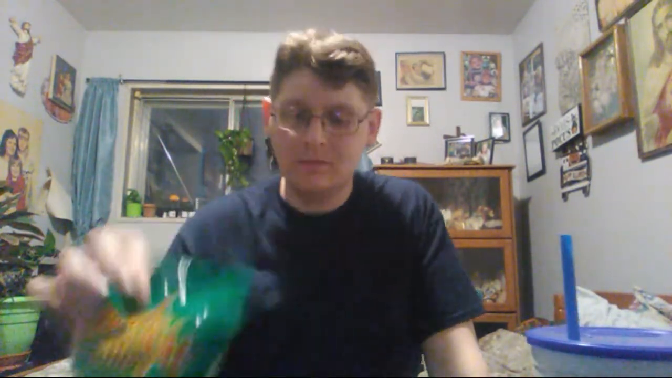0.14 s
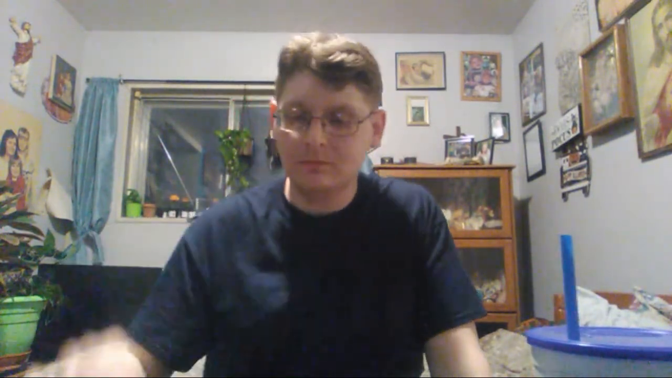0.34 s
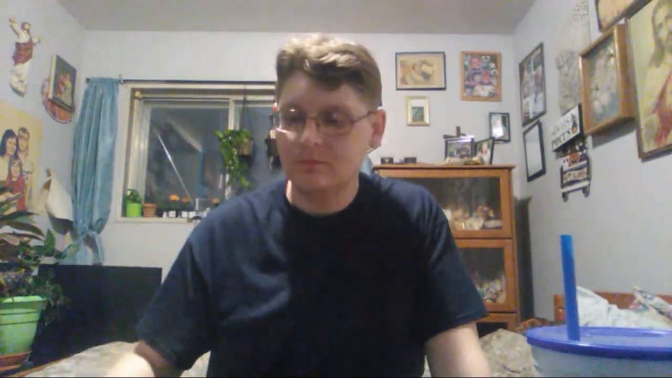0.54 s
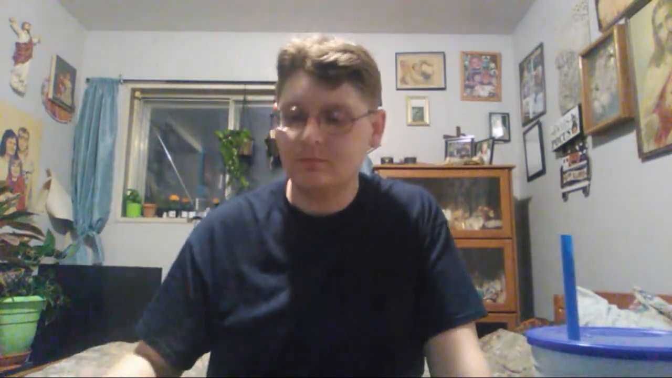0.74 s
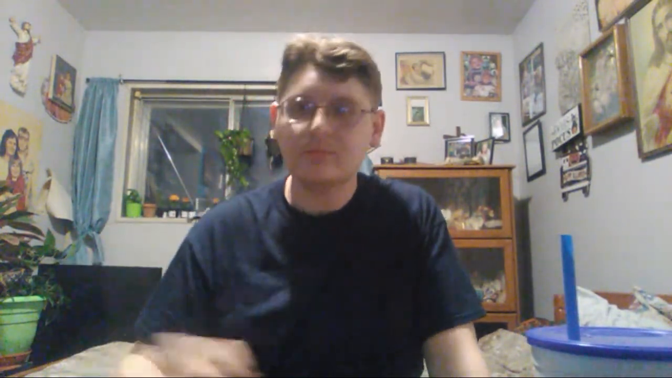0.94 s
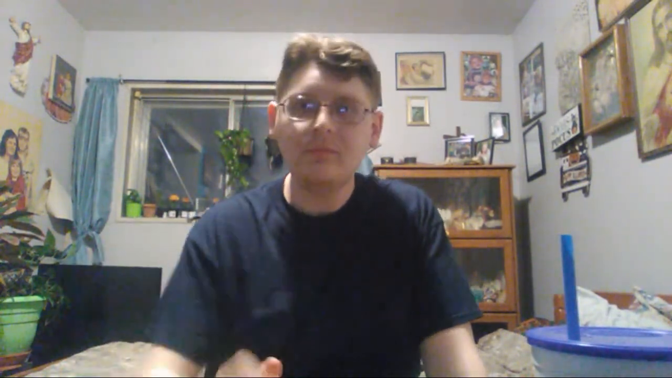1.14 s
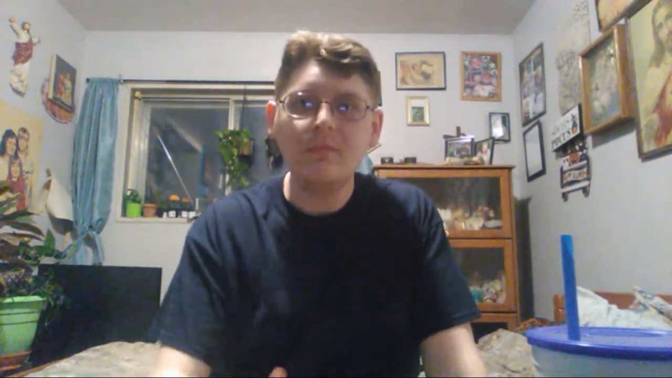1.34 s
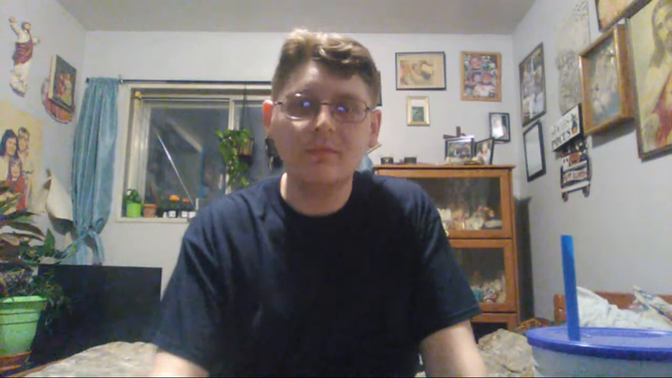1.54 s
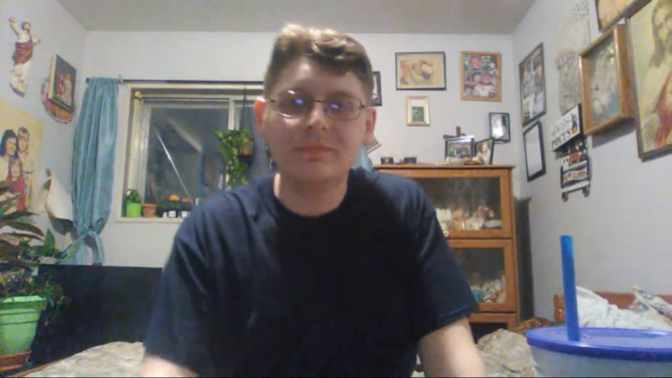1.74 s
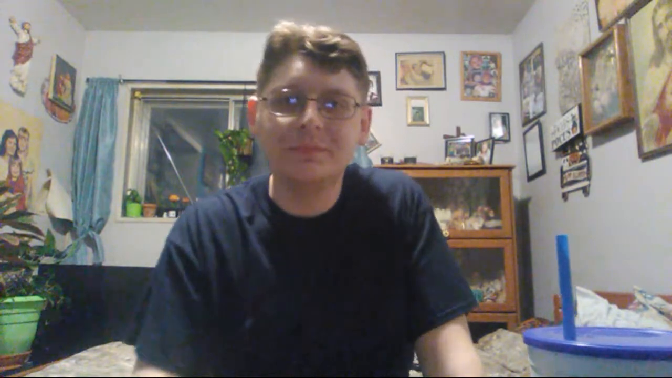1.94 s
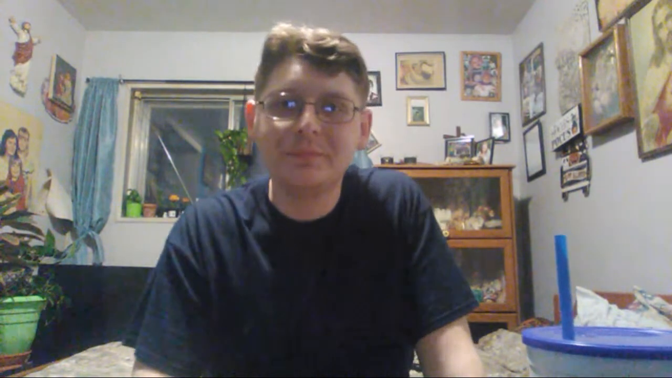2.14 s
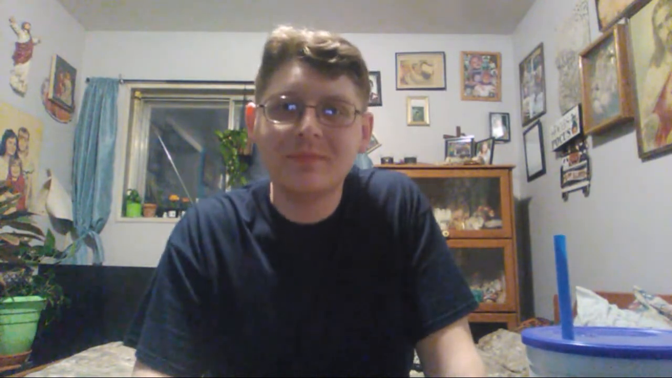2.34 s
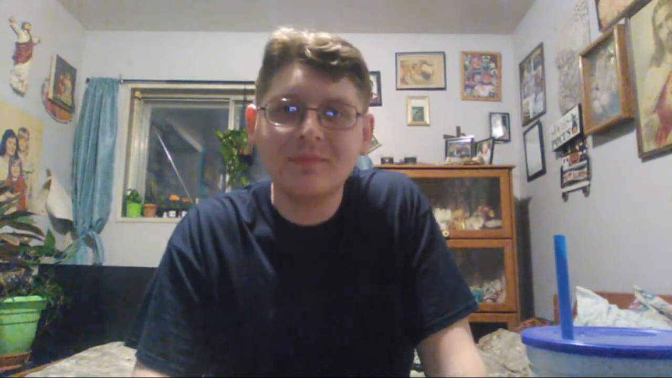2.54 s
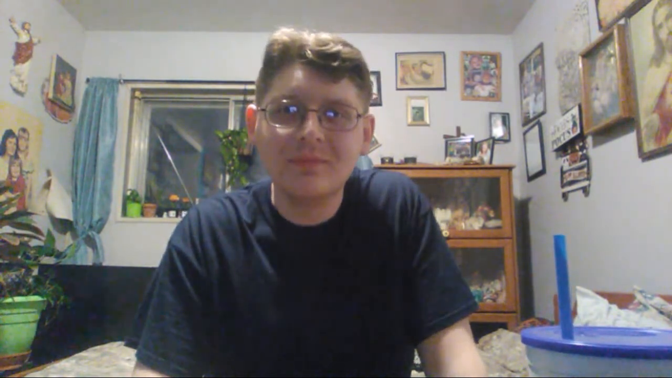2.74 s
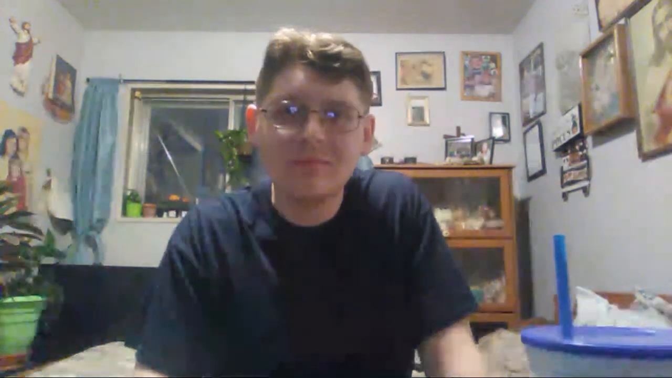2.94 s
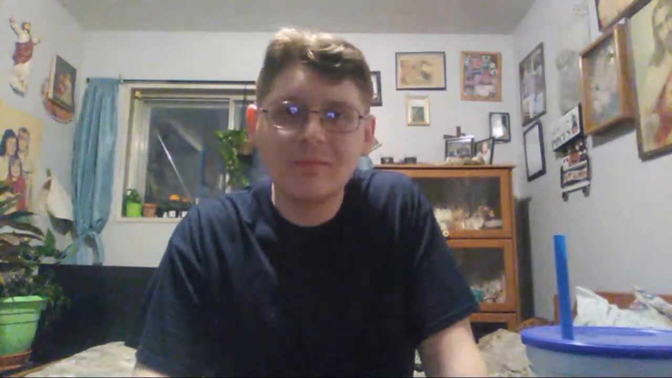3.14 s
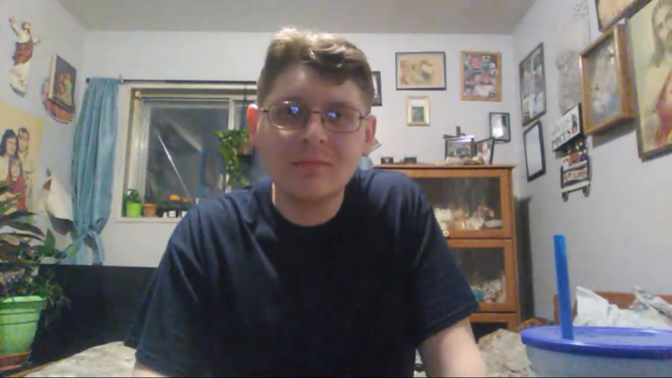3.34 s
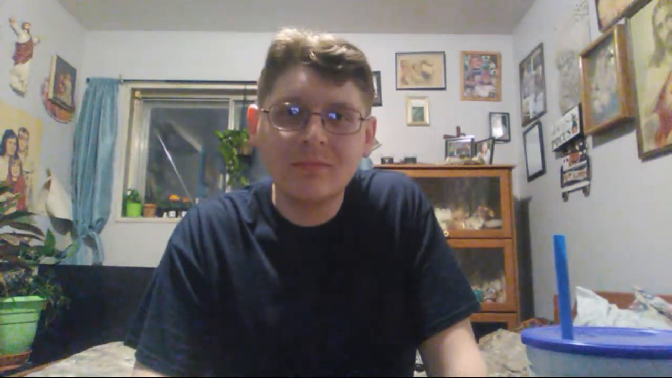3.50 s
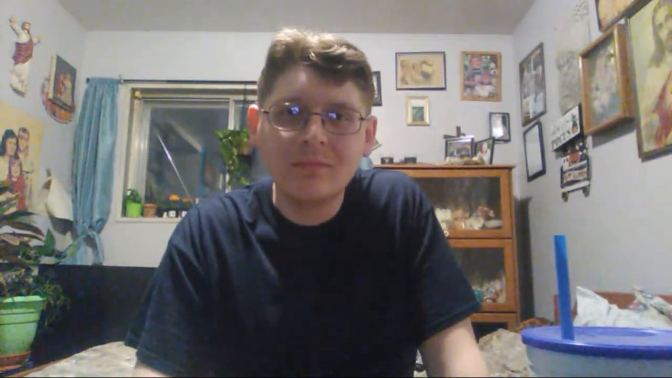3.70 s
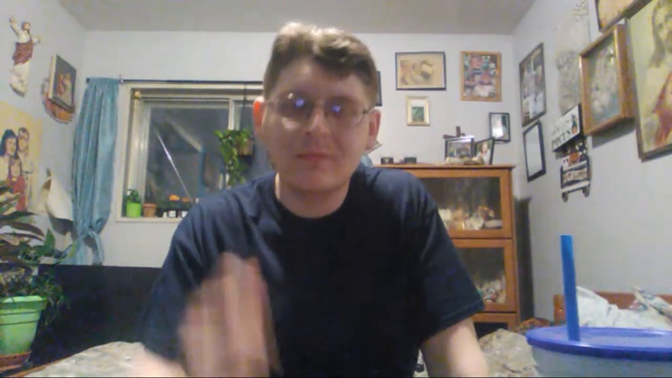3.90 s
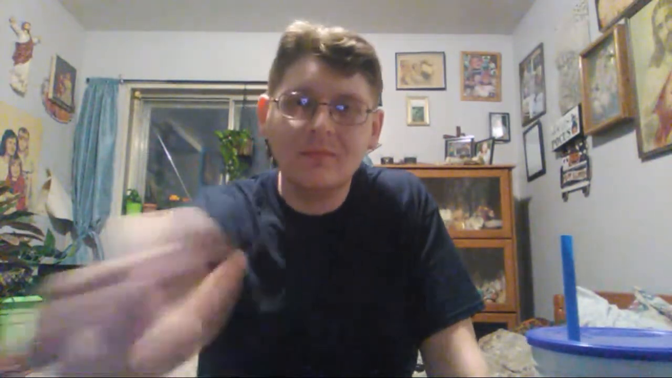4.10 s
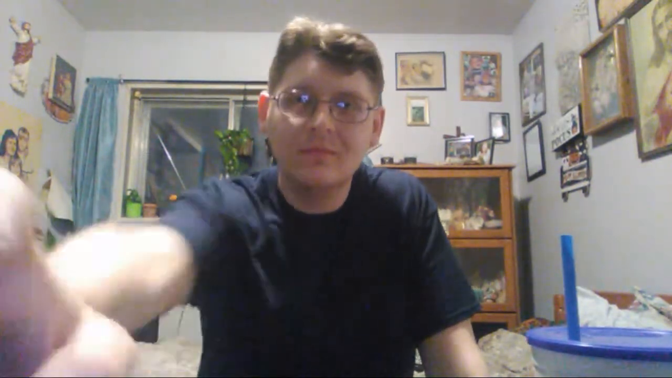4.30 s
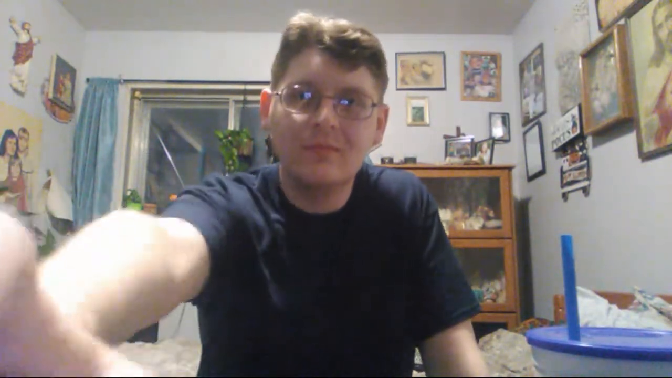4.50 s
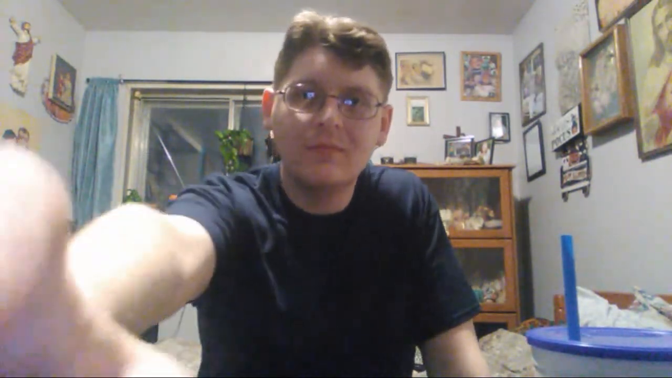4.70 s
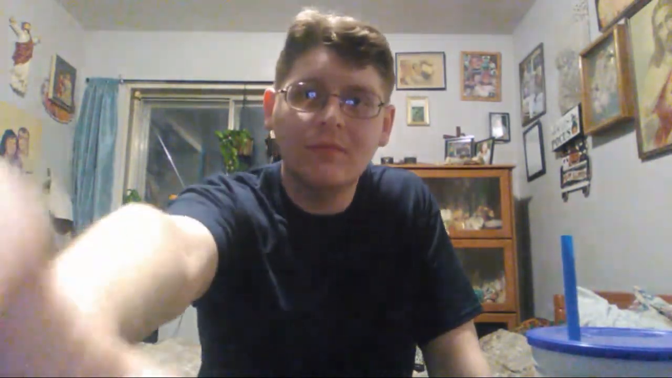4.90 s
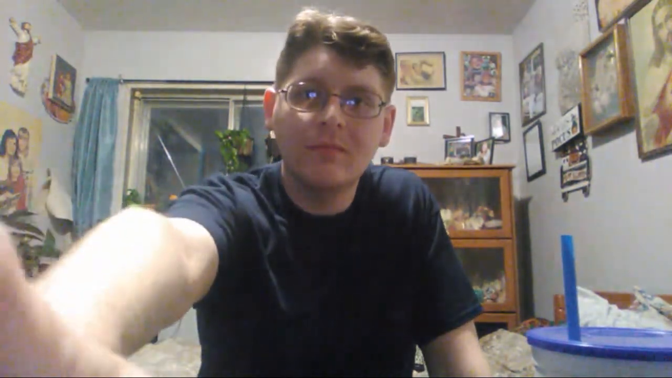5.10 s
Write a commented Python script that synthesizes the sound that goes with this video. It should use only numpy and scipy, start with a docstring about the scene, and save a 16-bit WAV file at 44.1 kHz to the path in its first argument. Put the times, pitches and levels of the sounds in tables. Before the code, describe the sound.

A foil snack bag is set down by hand near a laptop microphone in a furnished room. Half a second of dense, loud crackling with low thumps comes first, then a pause, a second tight cluster of snaps and bumps, a few isolated clicks, and a single pop. Later there is a soft desk bump and faint cloth rustles over steady low hiss.

```python
"""Crumpling of a foil snack bag

A foil snack bag is put down by hand near a laptop microphone in a furnished room. Its film crackles
densely as clumped random clicks, and creases snap as jolts that ring two facets; diffuse echoes follow.
Soft bumps ring damped desk modes, and dragging rumbles as low noise. Faint rustles, of cloth or film,
are short swells of band noise. Below lies microphone hiss, its treble lifted while a suppressor is open."""
import sys
import numpy as np
from scipy import signal
from scipy.fft import rfft, irfft
from scipy.io import wavfile
from scipy.ndimage import uniform_filter1d

SR = 44100
rng = np.random.default_rng(int(sys.argv[2]) if len(sys.argv) > 2 else 0)


def dump(signal):
    """Clip the signal to [-1, 1] and save it as 16-bit WAV at the path in sys.argv[1]."""
    limited = np.clip(np.atleast_2d(signal).T, -1, 1)
    pcm = np.round(limited * 32767).astype(np.int16)
    wavfile.write(sys.argv[1], SR, pcm)


N = 231613


def from_db(db):
    """Level to amplitude: 20 dB is a factor of ten."""
    return 10 ** (np.asarray(db) / 20)


def rms_one(x):
    """Normalisation by mean power: scale to rms 1."""
    return x / np.sqrt(np.mean(x ** 2) + 1e-20)


def peak_at(x, db):
    """Normalisation by crest: scale to a peak level."""
    return x * from_db(db) / np.max(np.abs(x))


def add(out, s, x):
    """Superposition: mix a short sound in at time s."""
    i = round(s * SR)
    out[i:i + len(x)] += x[:N - i]


def in_time(spans, column):
    """Piecewise linear envelope in dB; silent outside the spans."""
    t = np.arange(N) / SR
    out = np.full(N, -120.)
    for rows in map(np.array, spans):
        inside = (t >= rows[0, 0]) & (t <= rows[-1, 0])
        out[inside] = np.interp(t[inside], rows[:, 0], rows[:, column])
    return out


def at_hz(points, hz, column=1):
    """Interpolation of a spectrum table along log frequency."""
    points = np.array(points)
    return np.interp(np.log(hz), np.log(points[:, 0]), points[:, column])


def colour(x, spectrum):
    """Linear filtering: multiply the spectrum by a table's gains, then scale to rms 1."""
    hz = np.maximum(np.fft.rfftfreq(N + 1, 1 / SR), 1)
    shaped = rfft(x, N + 1) * from_db(at_hz(spectrum, hz))
    return rms_one(irfft(shaped, N + 1)[:N])


def drift(rate_hz):
    """Low-passed random fluctuation of rms 1, computed at every 40th sample."""
    r = np.exp(-2 * np.pi * rate_hz * 40 / SR)
    noise = rng.standard_normal(N // 40 + 2002)
    slow = signal.lfilter([1], [1, -2 * r, r * r], noise)[2000:]  # the filter has settled by then
    return np.interp(np.arange(N) / 40, np.arange(len(slow)), rms_one(slow))


def ring(x, hz, t60):
    """Damped mode: a two-pole resonator that decays by 60 dB in t60 seconds."""
    r = from_db(-60 / (t60 * SR))
    w = 2 * np.pi * hz / SR
    return signal.lfilter([0, np.sin(w)], [1, -2 * r * np.cos(w), r * r], x + 1e-18)


# treble level that opens the suppressor, greatest lift of the hiss treble, and fall of the held level
GATE_DB, GATE_LIFT_DB, GATE_FALL_DB_PER_S = -57.5, 17, 248


def gate_open(x):
    """Envelope following: lift in dB that tracks rising treble at once and falls steadily."""
    treble = signal.sosfilt(signal.butter(4, 6000, "high", fs=SR, output="sos"), x)
    power = uniform_filter1d(treble ** 2, size=221)  # mean over 5 ms
    level_db = 10 * np.log10(power.clip(1e-12))
    fall = GATE_FALL_DB_PER_S * np.arange(N) / SR
    held_db = np.maximum.accumulate(level_db + fall) - fall
    return np.clip(held_db - GATE_DB, 0, GATE_LIFT_DB)


# spectrum of the hiss: [f/Hz, relative level/dB]
HISS_SPECTRUM = [(25, -26.5), (40, -11.5), (62, 2.5), (125, -1), (250, -3.5), (500, -9.5), (1000, -10),
                 (2000, -14), (4000, -22.5), (7500, -27), (8400, -21.5), (12000, -24), (16000, -24.5)]
HISS_DB, HISS_TOP_HZ = -62, 16000  # level before the wavering and lift; upper band limit
HISS_DIP_S, HISS_DIP_DB, HISS_DIP_HALF_S = 3.3, -19, 0.0091  # the hiss dips briefly


def hiss(open_db):
    """Stationary noise of microphone and room, wavering in two bands; the upper one is lifted by open_db."""
    noise = colour(rng.standard_normal(N), HISS_SPECTRUM)
    low = signal.sosfilt(signal.butter(4, 4800, fs=SR, output="sos"), noise)
    high = signal.sosfilt(signal.butter(4, 4800, "high", fs=SR, output="sos"), noise)
    low = low * from_db(1.8 * drift(14))
    wavering = low + high * from_db(1.2 * drift(8) + open_db)
    dip_db = HISS_DIP_DB * np.exp(-((np.arange(N) / SR - HISS_DIP_S) / HISS_DIP_HALF_S) ** 2)
    top = signal.cheby2(12, 40, HISS_TOP_HZ, fs=SR, output="sos")
    return signal.sosfilt(top, wavering) * from_db(HISS_DB + dip_db)


# echoes of the furnished room: [f/Hz, decay time by 60 dB t60/s, level/dB]
ECHO = [(100, 0.18, -23.5), (400, 0.13, -21), (1226, 0.25, -15), (3070, 0.12, -17.5), (5920, 0.057, -14.5),
        (9000, 0.057, -12.5), (14057, 0.16, -20.5)]
EDGES = 30 * 2 ** np.arange(0, 9.3, 1 / 3)  # third-octave band edges in Hz


def room(x, gap_s=.003):
    """Diffuse reverberation: convolution with noise that decays at its own rate in every band."""
    t = np.arange(SR // 3) / SR
    tail = 0
    for low, high in zip(EDGES[3::2], EDGES[5::2]):
        hz = np.sqrt(low * high)
        band_filter = signal.butter(2, [low, high], "band", fs=SR, output="sos")
        band = signal.sosfilt(band_filter, rng.standard_normal(len(t)))
        dying = from_db(-60 * t / at_hz(ECHO, hz, column=1))
        unit_decay = dying / np.sqrt(np.sum(dying ** 2))
        tail = tail + band * unit_decay * from_db(at_hz(ECHO, hz, column=2))
    onset = 1 - np.exp(-(t / gap_s) ** 2)  # echoes set in gradually after the direct sound
    return signal.fftconvolve(x, tail * onset)[:N]


# soft rustles, of cloth or film: [t/s, rms level before the swell/dB, centre f/Hz, half length/s]
RUSTLES = [(1.479, -61, 2360, 0.013), (1.683, -44.5, 1800, 0.025), (2.127, -63, 611, 0.035),
           (3.057, -44, 1000, 0.016), (3.088, -58.5, 1200, 0.019), (3.132, -57.5, 804, .012),
           (3.914, -67, 604, .015), (4.064, -57.5, 498, 0.019), (4.074, -56.5, 89.2, 0.021),
           (4.204, -60, 297, 0.027), (4.293, -57.5, 696, 0.029), (4.59, -57.5, 299.7, .02),
           (4.694, -56.5, 351, 0.017), (4.869, -62, 700, 0.015), (4.91, -56, 500, 0.018)]


def rustles():
    """Band-limited noise under short Gaussian swells."""
    out, t = np.zeros(N), np.arange(N) / SR
    for s, db, hz, half in RUSTLES:
        band = signal.butter(2, [hz / 1.8, hz * 1.4], "band", fs=SR, output="sos")
        near = np.abs(t - s) < 3 * half
        swell = np.exp(-((t[near] - s) / half) ** 2)
        noise = rms_one(signal.sosfilt(band, rng.standard_normal(near.sum())))
        out[near] += from_db(db) * swell * noise
    return out


# the bag dragging on the desk, in spans: [t/s, rumble level/dB]
DRAG = [
    [(0.0, -35.5), (0.34, -26), (0.414, -35.5), (0.538, -23), (0.676, -84)],
    [(1.24, -53), (1.47, -76.5), (1.59, -48), (1.712, -44), (1.87, -45.5), (2.018, -61.5), (2.174, -58.5),
     (2.3, -76.5)],
    [(3.6, -51), (3.76, -44), (3.8, -53), (3.91, -54), (3.96, -72)],
]
# spectrum of the rumble: [f/Hz, relative level/dB]
DESK_SPECTRUM = [(18, -49.5), (30, -19.5), (86, 7), (256, 3.5), (286, -1.5), (600, -7.5), (780, -39),
                 (1320, -120)]


def rumble():
    """Structure-borne friction: low noise carried by the desk, its level lumpy."""
    level_db = in_time(DRAG, 1) + 1.4 * drift(40)
    return colour(rng.standard_normal(N), DESK_SPECTRUM) * from_db(level_db)


# bumps through the desk: [t/s, peak level/dB, main mode f/Hz]
BUMPS = [(0.099, -4, 132), (0.108, -7.5, 80), (0.12, -12, 250), (0.485, -12, 76), (0.695, -17.5, 265),
         (1.259, -24, 89), (1.287, -10, 256.4), (1.302, -18, 88), (1.54, -15, 378.3), (1.623, -29, 190.2),
         (1.669, -33.5, 156.6), (1.686, -30, 74), (1.72, -25.5, 225.8), (1.755, -34, 221.5),
         (3.619, -15.5, 180.3), (3.631, -11.5, 163), (3.647, -16, 116), (3.662, -21.5, 81),
         (3.706, -28, 133), (3.716, -23, 78.1), (3.731, -27.5, 333), (3.75, -27, 190), (3.79, -38, 108),
         (3.824, -41, 179)]
BUMP_T60_S = .055  # of the main mode


def bumps():
    """Modal excitation: a soft push rings a desk mode and two neighbours that die sooner."""
    out, t60 = np.zeros(N), BUMP_T60_S
    for s, db, hz in BUMPS:
        push = np.zeros(12000)
        width = round(.45 * SR / hz)  # contact lasts just under half a cycle
        push[:width] = np.hanning(width)
        modes = ring(push, hz, t60)
        modes -= 0.5 * ring(push, .6 * hz, .8 * t60)
        modes += 0.65 * ring(push, 1.55 * hz, 0.45 * t60)
        add(out, s, peak_at(modes, db))
    return out


# shaking out after a snap: delay and rise, then a quick and a slow burst under the snap's level
TRAIL_DELAY_S, TRAIL_RISE_S = .002, .003
QUICK_DB, QUICK_FALL_DB_PER_S = -24.5, 2500.5
SLOW_DB, SLOW_FALL_DB_PER_S = -33.5, 380.5
# its treble, under the snap's level; share of the crack's dullness that it keeps
TRAIL_SHEEN_DB, TRAIL_SHEEN_FALL_DB_PER_S, TRAIL_DULLNESS = -45.5, 199.5, 0.31


def trails():
    """Relaxation: gains of the crackle and its treble decay as the film shakes out after each listed snap."""
    body, sheen, t = np.zeros(N), np.zeros(N), np.arange(SR // 4) / SR
    rise = 1 - np.exp(-(t / TRAIL_RISE_S) ** 2)
    quick = from_db(QUICK_DB - QUICK_FALL_DB_PER_S * t)
    slow = from_db(SLOW_DB - SLOW_FALL_DB_PER_S * t)
    shake = rise * (quick + slow)
    for s, db, _, _, high_db, crack_db in SNAPS:
        dullness_db = crack_db - max(0, high_db, crack_db)  # crack against the strongest part
        sheen_db = db + TRAIL_SHEEN_DB + TRAIL_DULLNESS * dullness_db
        add(body, s + TRAIL_DELAY_S, from_db(db) * shake)
        add(sheen, s + TRAIL_DELAY_S, rise * from_db(sheen_db - TRAIL_SHEEN_FALL_DB_PER_S * t))
    return body, sheen


# squeezing of the film, one span held and one nudged: [t/s, crackle level/dB]
SQUEEZE = [
    [(0.012, -51.5), (0.022, -19.5), (0.064, -25.5), (0.086, -16), (0.152, -16.5), (0.172, -27),
     (0.215, -34), (0.232, -30), (0.296, -39.5), (0.316, -23.5), (0.33, -32), (0.4, -34), (0.455, -39),
     (0.476, -20), (0.63, -63)],
    [(3.59, -73.5), (3.62, -43), (3.67, -47.5), (3.69, -65), (3.72, -46.5), (3.83, -77)],
]
# spectrum of the crackle: [f/Hz, relative level/dB]
FILM_SPECTRUM = [(180, -39), (300, 0.5), (735, -7.5), (861, -0.5), (1620, -8.5), (1850, -7), (7000, -17.5),
                 (9100, -42.5), (15400, -120)]
# spectrum of the crackle's treble: [f/Hz, relative level/dB]
SHEEN_SPECTRUM = [(3530, -22), (6000, -2.5), (15200, -23.5), (16200, -31.5), (16500, -45.5)]
SHEEN_UNDER_DB = [-14, -1]  # treble against the crackle at a firm grip: held, nudged
SHEEN_STEEPER, FIRM_GRIP_DB = .3, -30  # extra treble in dB per dB of grip above the firm grip


def crackle(per_s=2500.0, spread_db=3.5, clump_db=4.0):
    """Random impulse process: countless tiny creases give way in clumps, most small, a few large."""
    size_db = spread_db * np.minimum(rng.exponential(1, N), 4)
    sizes = from_db(size_db) * rng.choice([-1, 1], N)
    happens = rng.random(N) < per_s / SR
    clicks = sizes * happens * from_db(clump_db * drift(42))
    body, sheen = trails()
    for span, under_db in zip(SQUEEZE, SHEEN_UNDER_DB):
        grip_db = in_time([span], column=1)
        sheen_db = grip_db + under_db + SHEEN_STEEPER * (grip_db - FIRM_GRIP_DB)
        body = body + from_db(grip_db)
        sheen = sheen + from_db(sheen_db)
    return body * colour(clicks, FILM_SPECTRUM) + sheen * colour(clicks, SHEEN_SPECTRUM)


# small creases while the film is held: number, peak over the crackle, highest crack over the large facet
SMALL_COUNT, SMALL_OVER_DB, SMALL_CRACK_TOP_DB = 14, 6.5, -14.5


def small_snaps():
    """Random buckling: snap rows at chance moments and facet sizes, as strong as the grip."""
    s, grip_db = np.transpose(SQUEEZE[0])
    when, large, small, balance = rng.random((SMALL_COUNT, 4)).T
    when = s[0] + when * (s[-1] - s[0])
    db = np.interp(when, s, grip_db) + SMALL_OVER_DB
    crack_db = SMALL_CRACK_TOP_DB - 6 * balance
    return list(zip(when, db, 460 * 2.6 ** large, 1550 * 1.6 ** small, -16 * balance, crack_db))


def facet(x, hz, cycles):
    """Plate resonance: a flat patch of film rings with an overtone, without bass or far treble."""
    t60 = cycles / hz
    rung = ring(x, hz, t60) - .5 * ring(x, 2.037 * hz, 0.45 * t60)
    edges = signal.butter(3, [.5 * hz, min(3.5 * hz, 18000)], "band", fs=SR, output="sos")
    return signal.sosfilt(edges, rung)


# creases that snap: [t/s, peak level/dB, large facet f/Hz, small facet f/Hz,
# small facet level over large/dB, crack level over large facet/dB]
SNAPS = [(0.022, -4, 870, 1850, 1.5, 10), (0.078, -4.5, 891, 5050, 10.5, 3.5),
         (0.083, -0.5, 870, 5100, 14.5, 6.5), (0.091, -5, 980, 3800, 9.5, 1),
         (0.096, -2.5, 894, 2350, 8, 0.5), (0.116, -6.5, 430, 1820, 4, 2.6),
         (0.129, -1.5, 465, 5800, 10, 5), (0.146, -2, 869, 4100, 11.5, -2),
         (0.152, -3, 1010, 3420, 6.5, 1.5), (0.212, -15, 960, 2020, 9, -9.5),
         (0.226, -8, 1510, 2770, -1, -28), (0.241, -19.5, 487, 1800, -19, -18.5),
         (0.309, -15, 1430, 1470, -13, -18.5), (0.315, -5, 1200, 5470, 16.5, 13.5),
         (0.341, -7, 458, 1590, 2.5, -8.5), (0.345, -11.5, 1080, 1750, 12.5, -3.5),
         (0.366, -7, 1190, 2440, 0.5, -4), (0.391, -20, 550, 1510, -5.5, -19.5),
         (0.414, -4.5, 450, 1990, 7, -0.5), (0.435, -13, 503, 2550, -2, -16),
         (0.461, -18.5, 616, 2860, 0.5, -36), (0.475, 1, 626, 3420, 12, -7.5),
         (0.483, -6.5, 460, 6000, 7, -23.5), (0.662, -11, 1240, 2250, 14, 5),
         (0.694, -16, 700, 1250, 3, -30), (0.913, -53.5, 686, 1462, -24, -23),
         (1.034, -48.5, 832, 2020, -20, -31.5), (1.255, 1.5, 439, 2335, 10, -24),
         (1.269, -11, 902, 1900, -14.5, -8.5), (1.285, -2, 993, 3140, 2.5, -13.5),
         (1.293, 0, 1300, 2850, 4, -2), (1.296, 0.5, 519, 1820, 1.5, -8.5), (1.328, 2, 915, 3050, 18, 5),
         (1.406, -50.5, 1140, 1596, 42, -5.5), (1.478, -38, 469, 2553, 26, 0),
         (1.498, -49, 1430, 2050, -18, -40), (1.657, -17, 850, 1800, -1, -55),
         (1.791, -28, 953, 2820, 14, 1), (1.807, 2.5, 920, 1740, -1, -6),
         (2.029, -50, 967, 2135, -2.5, -11.5), (2.063, -46.5, 956, 1810, -6.5, -6),
         (2.476, -5, 525, 4240, 0, -18.5), (3.617, -26.5, 437, 1950, 6.5, 18),
         (3.63, -22.5, 452, 2030, -9, 0), (3.719, -28, 471, 1605, -16, -6),
         (3.743, -29, 468, 2680, -12, -11)]


def snaps(rows, cycles, buckling_s, ragged):
    """Snap-through buckling: a crease jolts and shakes out; the facets beside it ring."""
    out, t = np.zeros(N), np.arange(-100, 2000) / SR
    bright = signal.butter(2, [4000, 10500], "band", fs=SR, output="sos")
    for s, db, low_hz, high_hz, high_db, crack_db in rows:
        envelope = np.exp(np.minimum(t / 0.00011, -t / buckling_s))
        burst = ragged * rng.standard_normal(len(t)) * envelope
        burst[100] = 1  # the jolt, at t = 0
        # patches of all sizes between the two main facets fill the gap
        between = signal.butter(2, [low_hz, 0.77 * high_hz + 300], "band", fs=SR, output="sos")
        parts = peak_at(facet(burst, low_hz, cycles), 0)
        parts += peak_at(facet(burst, high_hz, cycles), high_db)
        parts += peak_at(signal.sosfilt(between, burst), min(0, high_db) + 1.0)
        parts += peak_at(signal.sosfilt(bright, burst), crack_db)
        add(out, s - .0015, peak_at(parts, db))
    return out


def scene():
    """Superposition of the bag and bumps with their echoes, the desk rumble, rustles and hiss."""
    steady = crackle() + bumps()
    rows = SNAPS + small_snaps()
    near = snaps(rows, cycles=14.0, buckling_s=.0015, ragged=.25)
    # the walls hear each snap from all sides, where the facet pitches blur
    around = snaps(rows, cycles=2.9, buckling_s=.001, ragged=0.023)
    bag = steady + near + room(steady + around)
    return (bag + rumble() + rustles() + hiss(gate_open(steady + near)))[None]


CUTOFF_HZ = 16800


def record(dry):
    """Band limiting and soft saturation: bass rolled off, peaks rounded, top cut."""
    x = signal.sosfilt(signal.butter(4, 55, "high", fs=SR, output="sos"), dry)
    x = .9 * x / (1 + np.abs(x / .9) ** 6) ** (1 / 6)
    return signal.sosfilt(signal.cheby2(14, 70, CUTOFF_HZ, fs=SR, output="sos"), x)


dry = scene()
out = record(dry)
dump(out)
```